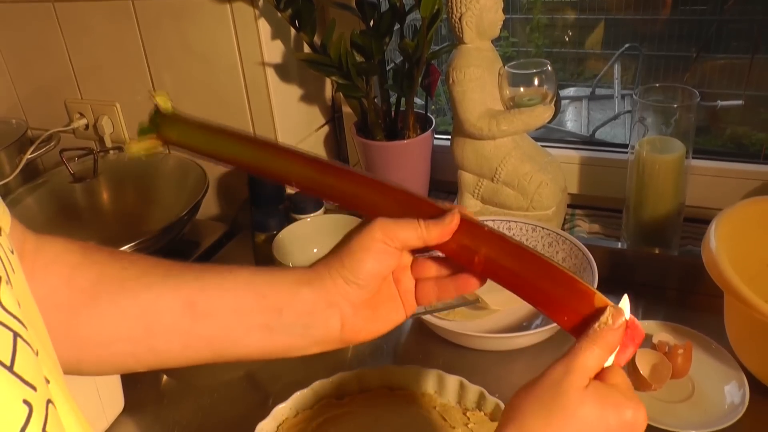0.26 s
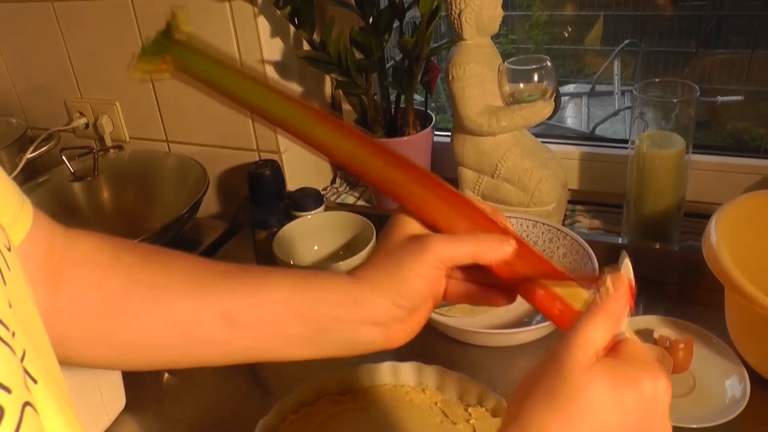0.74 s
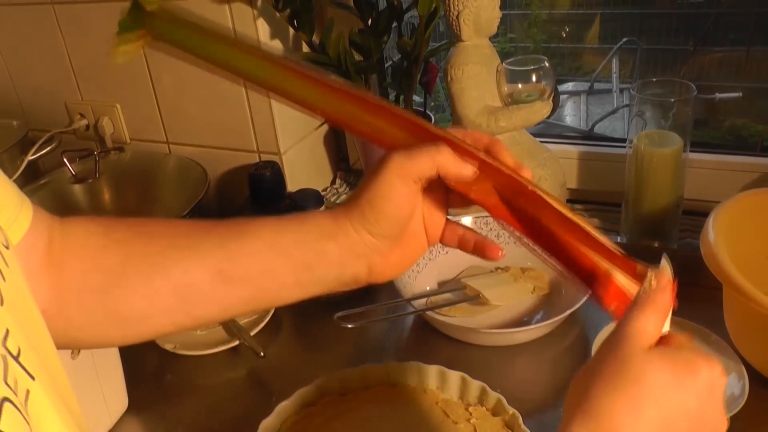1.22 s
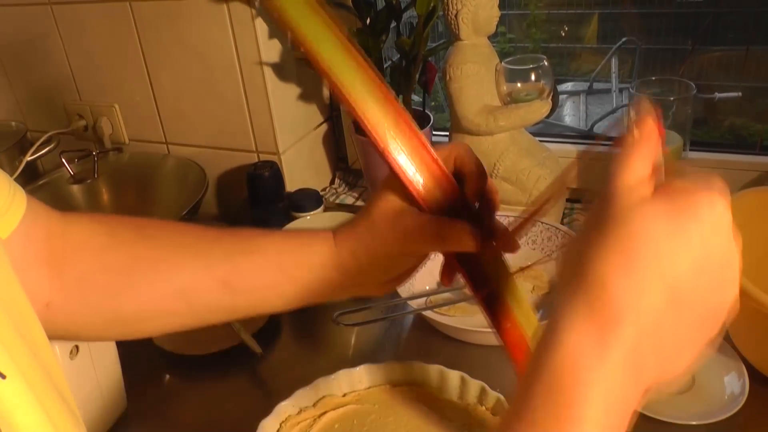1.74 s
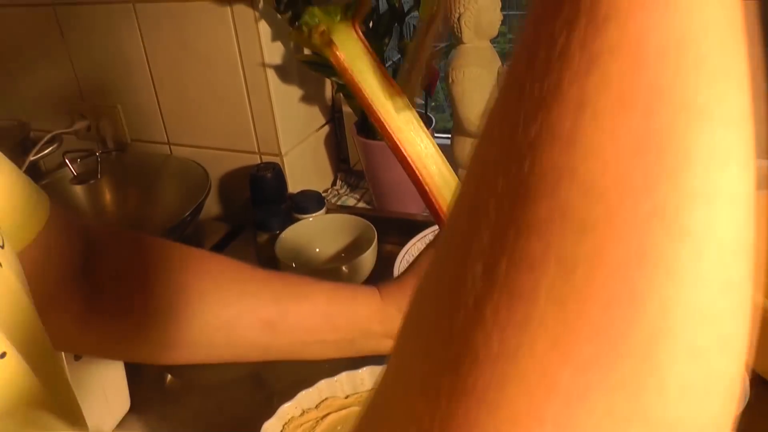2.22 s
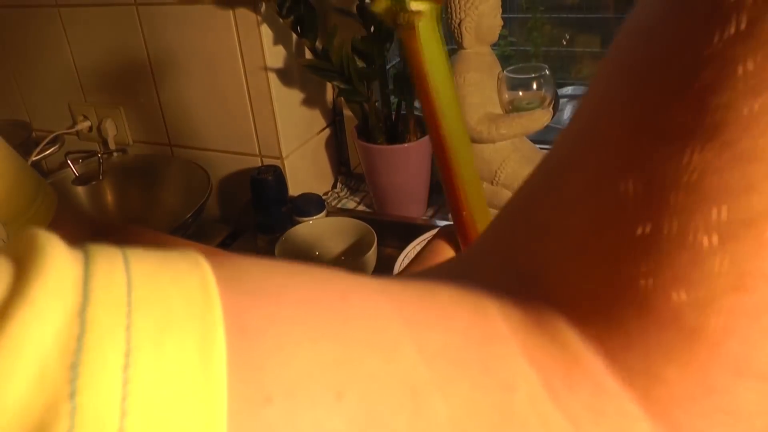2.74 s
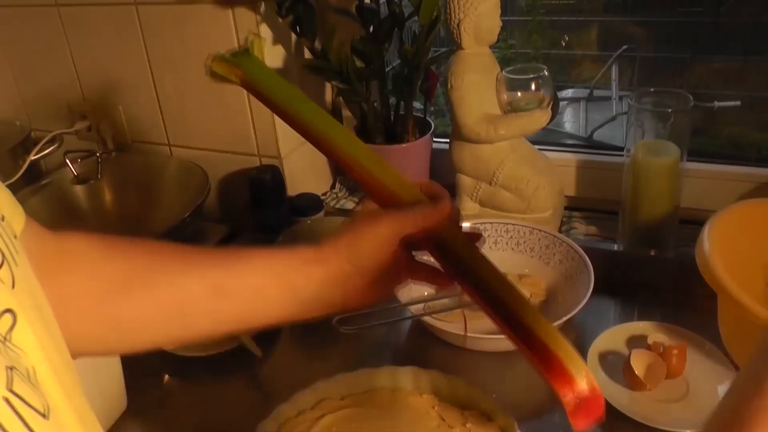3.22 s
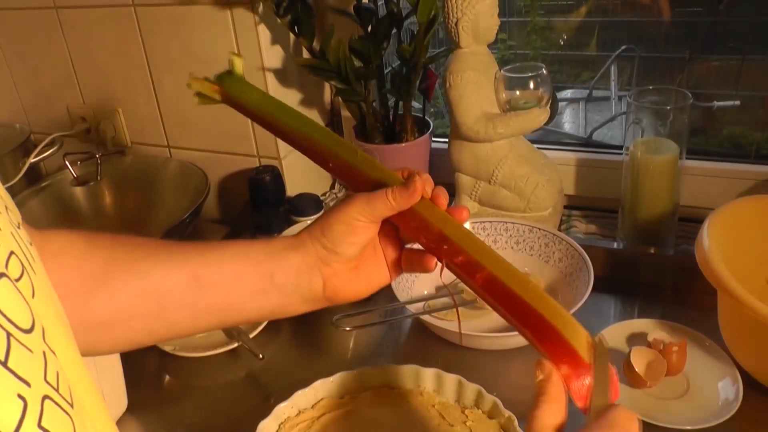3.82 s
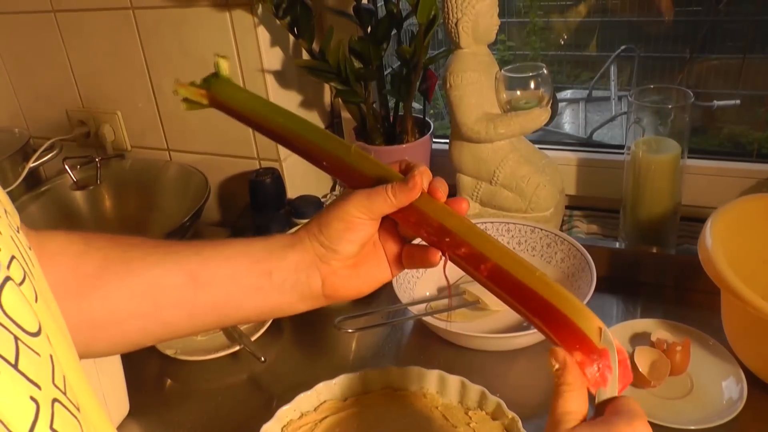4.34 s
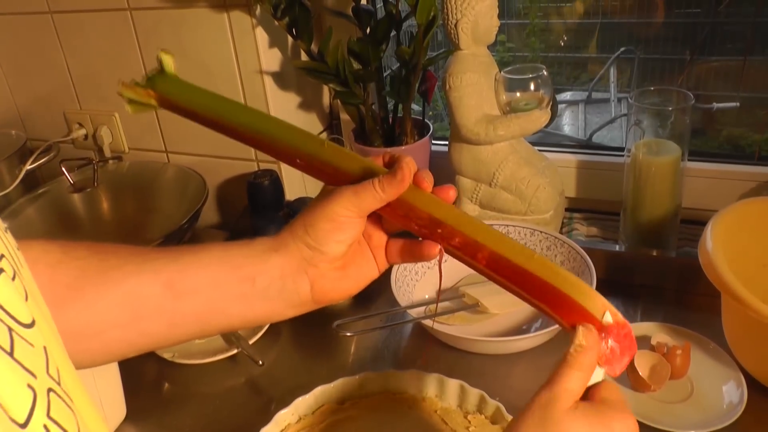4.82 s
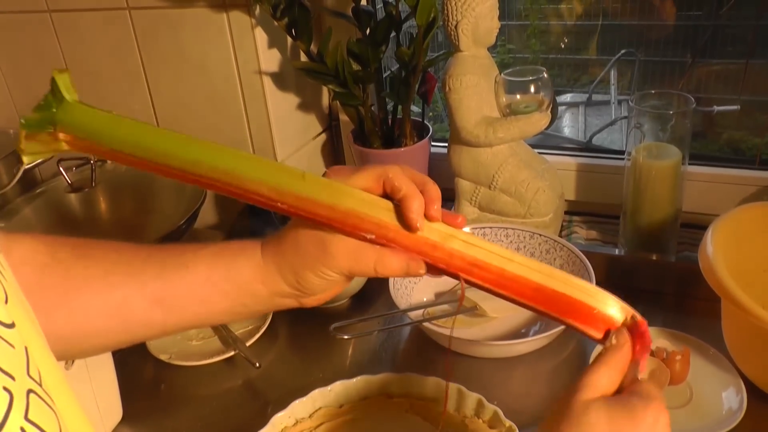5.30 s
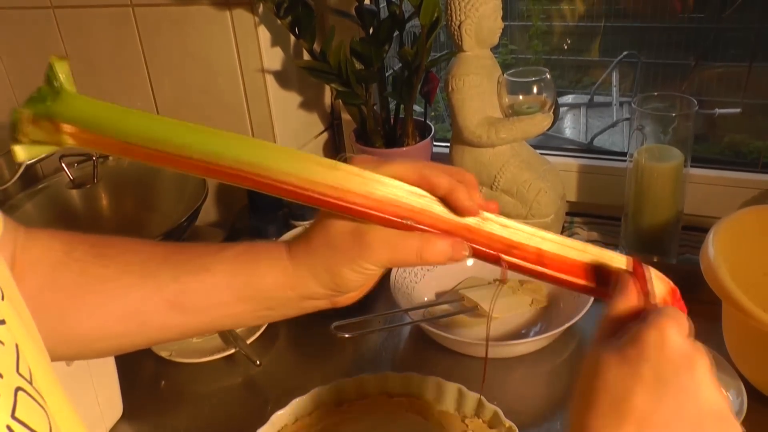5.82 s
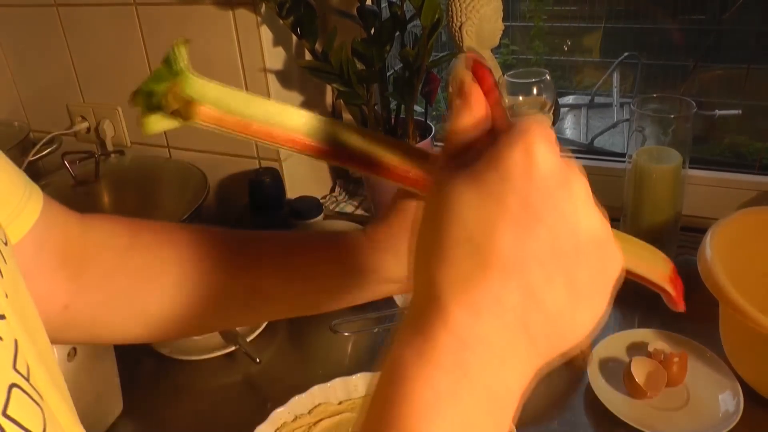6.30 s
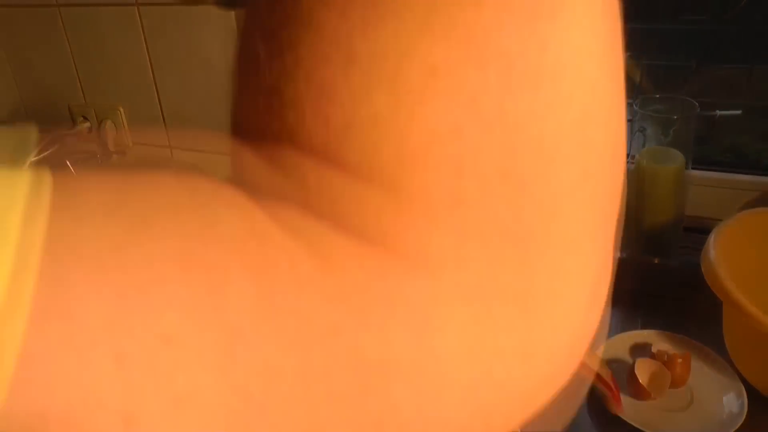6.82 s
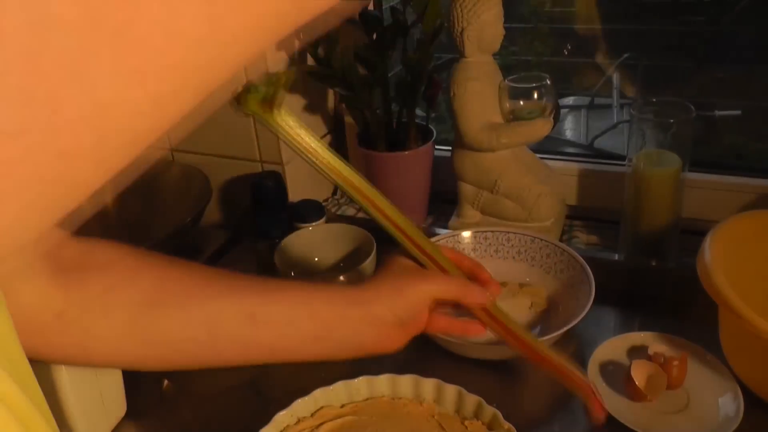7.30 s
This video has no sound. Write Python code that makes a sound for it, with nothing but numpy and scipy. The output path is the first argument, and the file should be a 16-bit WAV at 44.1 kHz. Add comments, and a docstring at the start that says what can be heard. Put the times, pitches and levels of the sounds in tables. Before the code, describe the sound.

In a small tiled kitchen, close to the microphone, a stalk is peeled by hand with a small knife. A sharp click starts it, then short crackling pulls and one longer tear. Heavy dull knocks hit the worktop mid-tear, followed by quieter ticks, fumbling and little tears. Near the end come strong, nearly continuous ripping strokes and another cluster of thuds. Soft hiss and muffled handling rumble lie underneath.

```python
"""A hand pulls fibrous skin off a plant stalk with a small knife in a tiled kitchen.
From the start the room hisses (shaped noise, narrow bands), a dull noise rumble swells and fades and fingers rustle.
Soon pulls and jerks part the fibres in a bright crackle of tiny impulses, strands snap as short noise bursts,
and knocks on the worktop thud and ring its modes. Two faint tones of narrow noise pass, then a low sine hum
swells and wavers in pitch; late in the peeling a narrow band sings as the blade slides under the skin."""
import sys
import numpy as np
from scipy import signal
from scipy.fft import rfft, irfft
from scipy.io import wavfile

SR = 44100
rng = np.random.default_rng(int(sys.argv[2]) if len(sys.argv) > 2 else 0)


def magnitude_from_level(level_db):
    """Linear magnitude for a level in decibels (20 dB per decade)."""
    exponent = np.asarray(level_db, float) / 20
    return 10 ** exponent


def master(y):
    """Save y as 16-bit WAV."""
    cut = np.clip(np.atleast_2d(y).T, -1, 1)
    pcm = np.round(cut * 32767)  # scale
    wavfile.write(sys.argv[1], SR, pcm.astype(np.int16))


N = 333340

# "Brightness" in every table is a shelf: the top rises and the bottom falls by this many dB.
# colour of the room and microphone hiss: f/Hz, relative level per Hz/dB
HISS = [(15, -28), (25, -11), (127, 3), (206, 0), (363, 4.5), (840, -2), (1190, -6.5), (1940, -10.5),
        (2110, -11.5), (2690, 1.5), (3920, -8.5), (5280, -11.5), (6560, -22), (11000, -22.5),
        (14800, -24.5), (16000, -22)]
HISS_DB = -63.5
# narrow noisy bands in the hiss: f/Hz, width of each resonance/Hz, level/dB
NARROW_BANDS = [(2602, 164, -69.5), (2755, 60, -71), (1938, 71, -80), (1574, 25, -84.5)]
# course of the dull rumble: t/s, level/dB, brightness/dB
RUMBLE = [(0.0, -71, -9), (0.5, -72.5, 8), (1.3, -53, 7), (1.89, -60, 9), (2.21, -81, 9), (2.57, -41, -1),
          (2.78, -67, -2), (3.1, -60, 8), (3.77, -60.5, -5.5), (4.08, -71.5, 8.5), (4.65, -73.5, 9),
          (5.07, -52.5, 6), (5.43, -52.5, -2), (5.89, -59, -2), (6.2, -66, 9), (6.8, -58, 12),
          (7.08, -55.5, 4), (7.16, -48.5, -3), (7.26, -43, -2.5), (7.56, -58.5, -1.5)]
# colour of the rumble: f/Hz, relative level per Hz/dB
RUMBLE_COLOUR = [(53, -16), (90, -17.5), (162, -10), (205, -4), (270, 0.5), (455, -5.5), (707, -9),
                 (996, -18.5), (1800, -20.5), (2040, -30.5), (2400, -22.5), (3120, -47), (5280, -120)]
# narrow peaks added to the rumble: f/Hz, width of each resonance/Hz, level against its body/dB
RUMBLE_PEAKS = [(214.6, 32, -12.5), (711, 8.4, -19), (1820, 36, -42)]
# fingers rustle on the stalk throughout: level/dB, brightness/dB
FINGERS_DB, FINGERS_BRIGHTNESS = -68, -1.9
# colour of the tearing skin: f/Hz, relative level per Hz/dB
TEAR_COLOUR = [(530, -22), (900, -17), (1680, -15.5), (2090, -17.5), (2730, -9.5), (3960, -7.5), (4520, -1),
               (6480, 0.5), (8660, -3.5), (11300, -11.5), (13500, -22.5), (16000, -21)]
# steady pulls: start t/s, end t/s, first level/dB, last level/dB, brightness/dB
PULLS = [(0.014, .15, -69, -66, -2), (0.376, 0.688, -79, -60, 3), (0.977, 1.044, -38, -37, -4.5),
         (1.789, 2.588, -46.5, -39.5, -3.5), (4.341, 4.414, -43, -47.5, -5), (4.91, 5.14, -44.5, -53, -7.5),
         (5.16, 5.72, -52.5, -51.5, 1.5), (5.8, 5.98, -57.5, -56.5, 3), (6.073, 6.182, -37, -36, 2),
         (6.224, 6.296, -43, -44, 3.5), (6.317, 6.749, -36, -37.5, -1.5), (6.8, 7.227, -41.5, -44.5, -2),
         (7.28, 7.398, -36.5, -46.5, -9)]
PULL_RISE_DB_PER_S, PULL_FALL_DB_PER_S = 185, 156
# sudden jerks on the skin: t/s, level/dB, hold/s, brightness/dB
JERKS = [(0.709, -43.5, .01, 3), (0.718, -38, 0.074, -5), (1.182, -48.5, .005, -6),
         (1.261, -45, 0.0054, -6), (1.353, -49, .005, -6.5), (1.456, -48.5, .005, -5.5),
         (1.574, -51, 0.0043, -7.5), (3.028, -35.5, 0.0019, -3.5), (2.91, -65, 0.055, 0),
         (3.288, -62, 0.09, -9), (3.63, -58.5, 0.056, -14.5), (4.174, -72, 0.047, -5),
         (4.277, -50.5, 0.033, -4), (4.522, -41.5, 0.07, -4), (4.856, -54, 0.045, -16),
         (7.25, -43, 0.013, -13)]
JERK_RISE_DB_PER_S, JERK_FALL_DB_PER_S = 807, 165
# the blade slides under the skin: start t/s, end t/s, first level/dB, last level/dB
SLIDING = (4.95, 5.88, -57.5, -59.5)
SLIDING_HZ, SLIDING_WIDTH_HZ = 6750, 1100
# single strands snap or the blade ticks: t/s, peak level/dB, brightness/dB, fraying against click/dB
SNAPS = [(0.153, -22.5, 8, -5), (0.1573, -15, -3.5, -17.5), (.6255, -39, 8, -19), (0.711, -29, 11, -3),
         (0.741, -27, -13, -20), (2.4244, -19.5, -5.5, 10), (2.9043, -54, 6, -10), (3.018, -22.5, -13, -14),
         (4.1673, -45.5, -5, -12), (4.322, -28.5, 0, -9), (4.346, -35, -2, -18), (4.53, -16, -0.5, -17),
         (4.57, -28, -2, -18), (4.805, -30, 1, -35), (4.853, -35.5, 9, 6), (4.873, -40, -9, -16),
         (4.896, -24.5, -3, -9), (5.0666, -23.5, -3.5, -24), (5.0742, -25, 6, -10), (5.446, -27, 14, -28),
         (5.688, -33.5, -12, -28), (5.737, -25, 4, -15), (6.005, -30, 6, -5), (6.1805, -16.5, 5, -22),
         (7.01, -18.5, -9, -2.5), (7.3737, -22.5, -18, -20)]
# knocks on the worktop: t/s, level/dB, thud f/Hz, hard edge gain/dB, decay constant of the contact/s
KNOCKS = [(0.1594, -33.5, 640, -8, 0.017), (2.4147, -12.5, 195, -27.5, 0.0056),
          (2.4239, -12, 485, -13.5, 0.012), (2.449, -12, 410, -9.5, 0.029),
          (3.0406, -34.5, 323, -15, 0.035), (3.2423, -39.5, 196, -32, 0.017),
          (3.626, -41.5, 604, -16, 0.04), (3.6996, -32, 520, -30, 0.02), (3.72, -36, 188, -19.5, 0.0079),
          (3.8206, -39, 470, -23, 0.026), (4.3252, -37, 576, -7, 0.051),
          (4.6984, -30.5, 308, -2.5, 0.00074), (4.921, -30.5, 238, -9, 0.0062),
          (6.9954, -18.5, 142.6, -22.5, 0.016), (7.011, -11.5, 494, -9, 0.021),
          (7.038, -12.5, 470, -8, 0.012), (7.2698, -16, 285, -27, 0.013), (7.276, -17, 534, -11, 0.023),
          (7.2917, -18, 473, -37, 0.0073), (7.309, -18, 490, -13, 0.0091), (7.536, -38, 600, -15, 0.0053)]
# modes of the worktop: f/Hz, relative level/dB, t60/s (held to 0.4 s at most when played)
WORKTOP = [(106.7, 8, 0.19), (157.5, -25, 0.32), (209.5, 1.5, 0.45), (273.5, -0.5, 0.55),
           (344.3, -7.5, 0.6), (460, -22, 0.37), (593, -1, 0.14), (710, -22, .14), (1096, -23, .12),
           (1263, -6, .12), (1660, -13, 0.093)]
# ringing of a 200 Hz thud at the reference force/dB, change per octave of thud pitch/dB, gain per dB of force
RING_DB, RING_DB_PER_OCTAVE, RING_PER_FORCE = -12.5, -6.5, 0.23
QUIETEST_DB = -45   # reference: force counts from a knock this faint
# reverberation of the kitchen: f/Hz, t60/s
KITCHEN_T60 = [(100, 0.42), (500, 0.22), (2000, 0.23), (6000, 0.11), (14000, 0.1)]
# faint narrow tones come and go: start t/s, end t/s, f/Hz, width of each resonance/Hz, level/dB
FAINT_TONES = [(0.44, 0.923, 209, 22, -69.5), (1.05, 1.8, 1815, 41, -66)]
# swells of the hum: start t/s, loudest t/s, end t/s, f/Hz, rms level at the loudest/dB
HUM = [(1.6, 2.102, 2.3, 73, -65), (4.4, 4.9, 6.8, 68, -64.5), (5.1, 5.45, 5.7, 72.3, -64)]
HUM_ENDS_DB = -11   # both ends of a swell, against its loudest
# filter that spreads the side signal: f/Hz, gain/dB
SIDE_LEVEL = [(60, -9), (110, -16.5), (200, -14.5), (380, -14.5), (700, -9), (1290, -6), (2380, -14),
              (4400, -20), (8120, -11.5), (15000, 0.5)]


def rms_one(x):
    """Scale to rms 1."""
    return x / np.sqrt(np.mean(x ** 2) + 1e-20)


def in_time(rows):
    """Draw each column of a curve sample by sample."""
    s, *columns = np.transpose(rows)
    return [np.interp(np.arange(N) / SR, s, column) for column in columns]


def at_hz(points, hz):
    """Read a curve on a log-frequency axis."""
    point_hz, value = np.transpose(points)
    return np.interp(np.log(np.maximum(hz, 1)), np.log(point_hz), value)


def coloured(x, spectrum, size=8192):
    """Minimum-phase filter with the given spectrum: nothing sounds before a click."""
    log_gain = np.log(magnitude_from_level(at_hz(spectrum, np.fft.rfftfreq(size, 1 / SR))))
    cepstrum = irfft(log_gain)
    # folding the cepstrum forward makes the response causal
    cepstrum[1:size // 2] *= 2
    cepstrum[size // 2 + 1:] = 0
    response = irfft(np.exp(rfft(cepstrum)))
    return signal.fftconvolve(x, response)[:N]


def tilted(x, pivot_hz, brightness_db):
    """Shelve the part above the pivot up and the part below down; brightness may move in time."""
    low = signal.sosfilt(signal.butter(1, pivot_hz, fs=SR, output="sos"), x)
    return low * magnitude_from_level(-brightness_db) + (x - low) * magnitude_from_level(brightness_db)


def drift(rate_hz):
    """Slow chance with spread 1: noise through two equal one-pole lowpasses, made at SR / 40."""
    r = np.exp(-80 * np.pi * rate_hz / SR)
    noise = rng.standard_normal(N // 40 + 2002)
    slow = signal.lfilter([1], [1, -2 * r, r * r], noise)[2000:]   # skip the run-in
    return np.interp(np.arange(N) / 40, np.arange(len(slow)), rms_one(slow))


def resonance(x, hz, width):
    """Two-pole resonance with gain 1 on top."""
    r = np.exp(-np.pi * width / SR)
    poles = [1, -2 * r * np.cos(2 * np.pi * hz / SR), r * r]
    return signal.lfilter([(1 - r * r) / 2, 0, (r * r - 1) / 2], poles, x)


def narrow(x, hz, width):
    """Two equal resonances in a row, at rms 1."""
    return rms_one(resonance(resonance(x, hz, width), hz, width))


def stroke(start, end, first_db, last_db, rise_db_per_s, fall_db_per_s):
    """Gain that climbs to its first level, runs to its last and falls away, straight in dB."""
    t = np.arange(N) / SR
    held_db = np.interp(t, [start, max(end, start + .001)], [first_db, last_db])
    rise_db = rise_db_per_s * np.maximum(start - t, 0)
    fall_db = fall_db_per_s * np.maximum(t - end, 0)
    return magnitude_from_level(held_db - rise_db - fall_db)


def hiss():
    """Steady room and microphone noise: shaped white noise plus a few narrow noisy bands."""
    out = magnitude_from_level(HISS_DB) * rms_one(coloured(rng.standard_normal(N), HISS))
    for hz, width, level_db in NARROW_BANDS:
        out += magnitude_from_level(level_db) * narrow(rng.standard_normal(N), hz, width)
    return out


def rumble():
    """Dull, finely grained noise with a few narrow peaks; it swells and fades."""
    level_db, brightness = in_time(RUMBLE)
    white = rng.standard_normal(N)
    noise = rms_one(coloured(white, RUMBLE_COLOUR))
    for hz, width, peak_db in RUMBLE_PEAKS:
        noise += magnitude_from_level(peak_db) * narrow(white, hz, width)
    grain_db = 2.2 * drift(25)
    return magnitude_from_level(level_db + grain_db) * tilted(noise, 715, brightness)


def effort():
    """Crackle gain and brightness: fingers, pulls and jerks add in power, and power weighs the colour."""
    parts = [(magnitude_from_level(FINGERS_DB) ** 2, FINGERS_BRIGHTNESS)]
    for *pull, brightness in PULLS:
        parts.append((stroke(*pull, PULL_RISE_DB_PER_S, PULL_FALL_DB_PER_S) ** 2, brightness))
    for s, db, holds, brightness in JERKS:
        gain = stroke(s, s + holds, db, db, JERK_RISE_DB_PER_S, JERK_FALL_DB_PER_S)
        parts.append((gain ** 2, brightness))
    total = sum(power for power, _ in parts)
    return np.sqrt(total), sum(power * brightness for power, brightness in parts) / total


def tearing(per_s=8000., spread_db=1.0, clump_db=1.1):
    """Thousands of fibres part each second as impulses, in clumps and in uneven sizes."""
    gain, brightness = effort()
    sizes = magnitude_from_level(spread_db * np.minimum(rng.exponential(1, N), 5)) * rng.choice([-1, 1], N)
    grains = sizes * (rng.random(N) < per_s / SR) * magnitude_from_level(clump_db * drift(66))
    tough = rng.random(N) < 70 / SR
    grains = grains + tough * sizes * magnitude_from_level(-1.5)   # a few tougher strands, free of the clumping
    crackle = tilted(rms_one(coloured(grains, TEAR_COLOUR)), 2030, brightness)
    singing = narrow(grains, SLIDING_HZ, SLIDING_WIDTH_HZ)
    sliding_gain = stroke(*SLIDING, PULL_RISE_DB_PER_S, PULL_FALL_DB_PER_S)
    return gain * crackle + sliding_gain * singing


def snaps(fray_s=0.045):
    """A sharp click, then the torn end frays on for a moment, in the colour of the tearing skin."""
    size, click_s = 6000, .0015   # samples, decay constant of the click
    t = np.arange(size) / SR
    grit = rng.standard_normal((len(SNAPS), size))
    out = np.zeros(N + size)
    for (s, peak_db, brightness, fray_db), noise in zip(SNAPS, grit):
        burst = noise * (np.exp(-t / click_s) + magnitude_from_level(fray_db) * np.exp(-t / fray_s))
        burst[0] = 2.5   # a firm first sample
        click = tilted(coloured(burst, TEAR_COLOUR, size=512)[:size], 2800, brightness)
        # wet fibres dull the very top
        click = signal.sosfilt(signal.butter(2, 12500, fs=SR, output="sos"), click)
        out[round(s * SR):][:size] += magnitude_from_level(peak_db) * click / np.abs(click).max()
    return out[:N]


def contact(push, thud_hz, edge_db, thud_width=0.76):
    """A rough push heard as a thud round its own pitch plus a harder, broad edge, peak 1."""
    width = thud_width * thud_hz
    thud = resonance(resonance(push, thud_hz, width), thud_hz, 2 * width)
    # a soft body has no top
    thud = signal.sosfilt(signal.butter(4, 1.58 * thud_hz, fs=SR, output="sos"), thud)
    edge = resonance(resonance(push, 740, 670), 1030, 4500)
    both = thud + magnitude_from_level(edge_db) * edge
    return both / np.abs(both).max()


def knocks(thud_db=-1.5, rattle_db=-4.0, rattle_s=0.033, mode_spread_db=3.5):
    """A rough contact drives the worktop's modes and shakes what stands on it into a short diffuse rattle."""
    size = int(.5 * SR)
    out, t = np.zeros(N + size), np.arange(size) / SR
    hz, level_db, t60 = np.transpose(WORKTOP)[:, :, None]
    modes = np.sin(2 * np.pi * hz * t) * magnitude_from_level(level_db - 60 * t / np.clip(t60, .03, .4))
    noise = rng.standard_normal((len(KNOCKS), size + len(hz)))
    for (s, peak_db, thud_hz, edge_db, lasts), grit in zip(KNOCKS, noise):
        push = grit[:size] * np.exp(-t / max(lasts, .0005))
        push[:8] += 1   # the first touch is the firmest
        rattle = contact(grit[size - 1::-1] * t * np.exp(-t / rattle_s), thud_hz, edge_db)
        # a soft touch barely reaches the high modes
        reach_db = edge_db * np.clip(np.log2(hz[:, 0] / thud_hz) - 1, 0, 1)
        mode_gain = magnitude_from_level(mode_spread_db * grit[size:] + reach_db)
        rung = signal.fftconvolve(mode_gain @ modes, push)[:size]
        after = magnitude_from_level(rattle_db) * rattle + rung / np.abs(rung).max()
        # deep and forceful thuds ring most
        pitch_db = RING_DB_PER_OCTAVE * np.log2(thud_hz / 200)
        ring_db = RING_DB + pitch_db + RING_PER_FORCE * (peak_db - QUIETEST_DB)
        knock = magnitude_from_level(thud_db) * contact(push, thud_hz, edge_db) + magnitude_from_level(ring_db) * after
        out[round(s * SR):][:size] += magnitude_from_level(peak_db) * knock
    # no deep bass under the knocks
    return signal.sosfilt(signal.butter(3, 80, "high", fs=SR, output="sos"), out[:N])


def kitchen(x, first_echo_s=0.0011):
    """Dense echoes: noise that dies away octave by octave; energy 1."""
    t = np.arange(int(.8 * SR)) / SR
    edges, tail = 40 * 2 ** np.arange(0, 9.1, 1), 0
    for low, high in zip(edges, edges[1:]):
        octave = signal.butter(2, [low, high], "band", fs=SR, output="sos")
        band = signal.sosfilt(octave, rng.standard_normal(len(t)))
        tail = tail + band * magnitude_from_level(-60 * t / at_hz(KITCHEN_T60, np.sqrt(low * high)))
    tail *= t > first_echo_s
    return signal.fftconvolve(x, tail / np.sqrt(np.sum(tail ** 2)))[:N]


def faint_tones(fade_db_per_s=102.0):
    """Noise through narrow resonances, fading in and out."""
    out = 0
    for start, end, hz, width, db in FAINT_TONES:
        gain = stroke(start, end, db, db, fade_db_per_s, fade_db_per_s)
        out = out + gain * narrow(rng.standard_normal(N), hz, width)
    return out


def hum(waver_hz=1.3, fade_s=0.057):
    """Low sine tones that swell, three in all, each wavering a little in pitch."""
    out, t = 0, np.arange(N) / SR
    for start, top, end, hz, db in HUM:
        level_db = db + np.interp(t, [start, top, end], [HUM_ENDS_DB, 0, HUM_ENDS_DB])
        # short fades just outside the swell
        sounding = np.clip(np.minimum(t - start, end - t) / fade_s + 1, 0, 1)
        phase = 2 * np.pi * np.cumsum(hz + waver_hz * drift(4.2)) / SR
        out = out + sounding * magnitude_from_level(level_db) * np.sin(phase)
    return np.sqrt(2) * out   # levels are rms


def scene():
    """Close sounds sit near the middle; fresh echoes, tearing, rumble and hiss spread to the sides."""
    tear, snap, knock = tearing(), snaps(), knocks()
    send = magnitude_from_level(-11.5) * tear + magnitude_from_level(-6.5) * snap + magnitude_from_level(-6.5) * knock
    # a small room holds no deep bass
    send = signal.sosfilt(signal.butter(2, 80, "high", fs=SR, output="sos"), send)
    mid = tear + snap + knock + kitchen(send) + rumble() + hum() + faint_tones() + hiss()
    spread = magnitude_from_level(2.0) * kitchen(send) + magnitude_from_level(1.0) * tearing() + magnitude_from_level(0.5) * rumble() + magnitude_from_level(10) * hiss()
    side = coloured(spread, SIDE_LEVEL)
    balance = magnitude_from_level(np.array([[-.3], [.3]]))   # left, right
    return mid * balance + side * [[1], [-1]]


def band_limit(x):
    """A steep low-pass at the top of the band."""
    return signal.sosfilt(signal.butter(12, 15850, fs=SR, output="sos"), x)


def record(dry):
    """Deliver the finished mix."""
    return band_limit(dry)


dry = scene()
out = record(dry)
master(out)
```